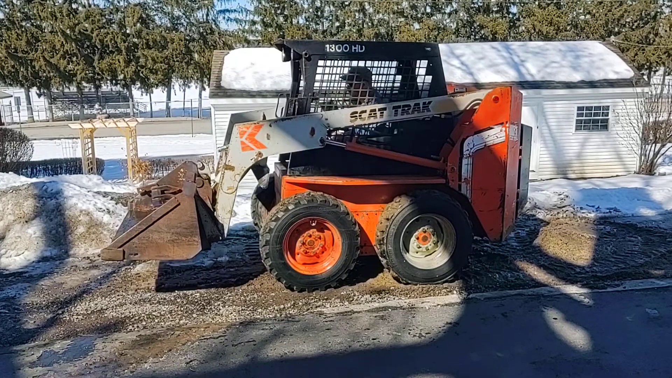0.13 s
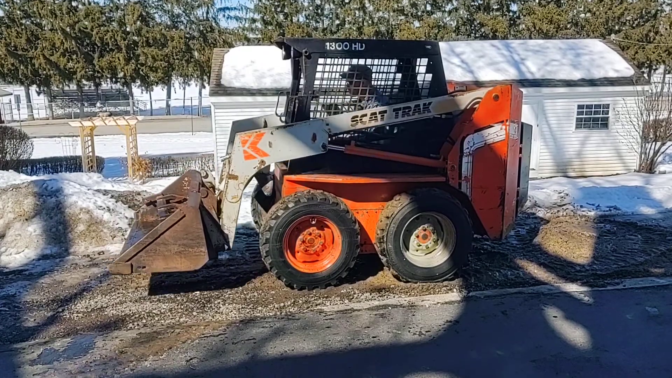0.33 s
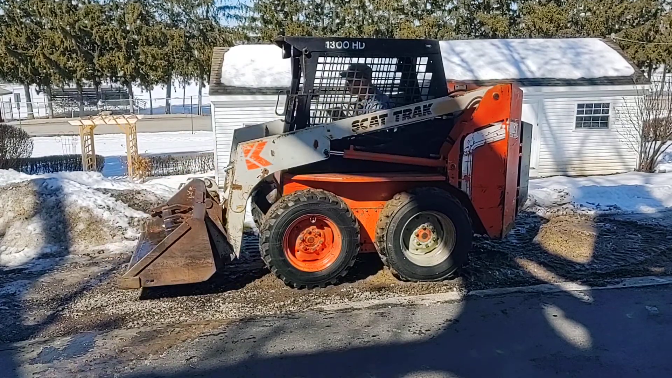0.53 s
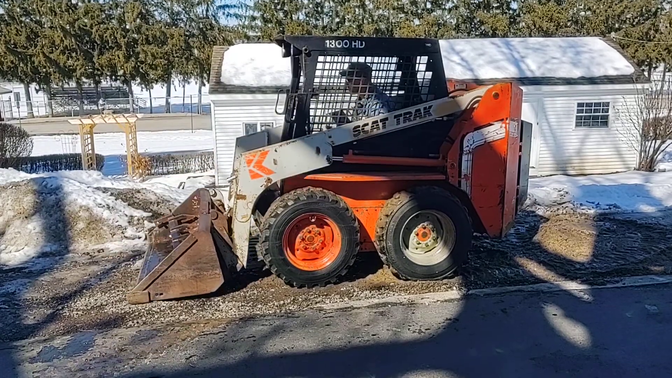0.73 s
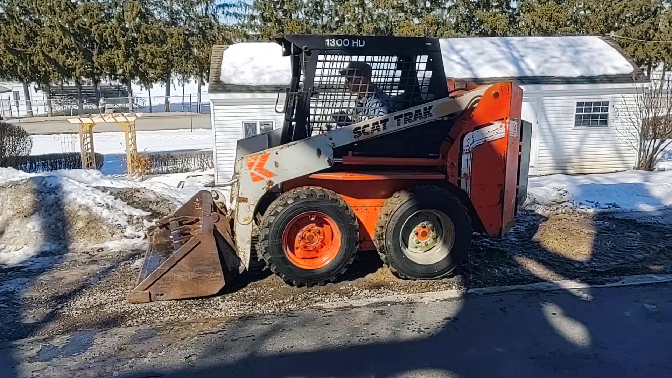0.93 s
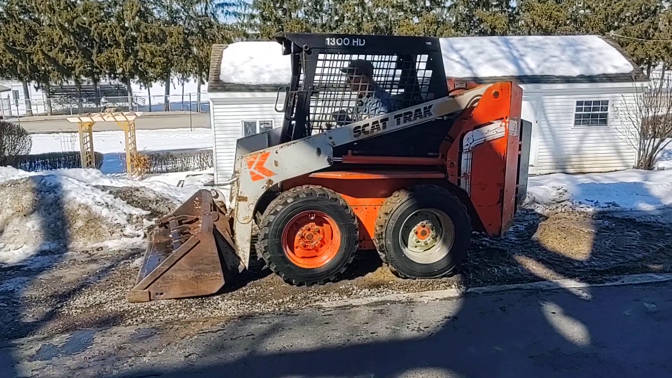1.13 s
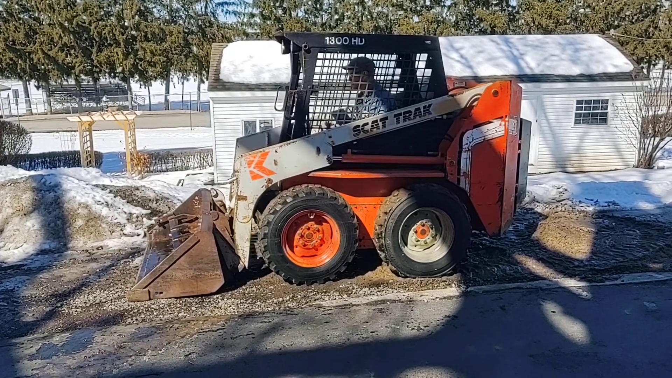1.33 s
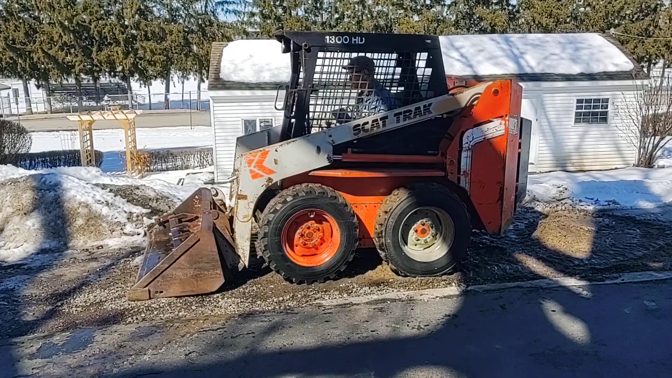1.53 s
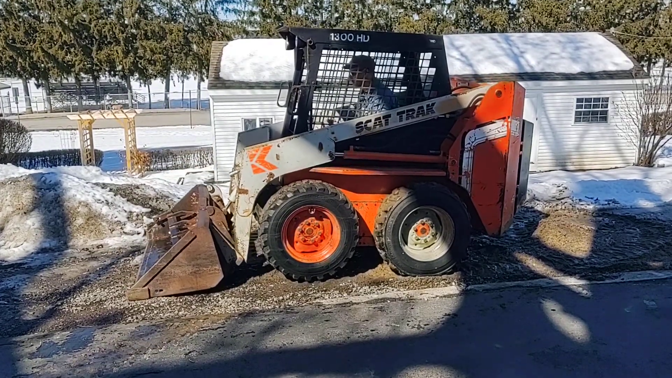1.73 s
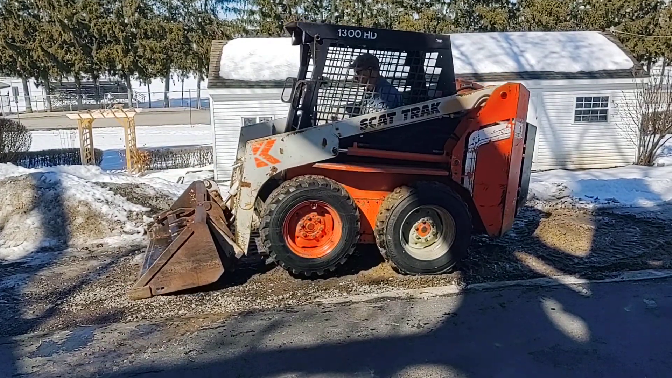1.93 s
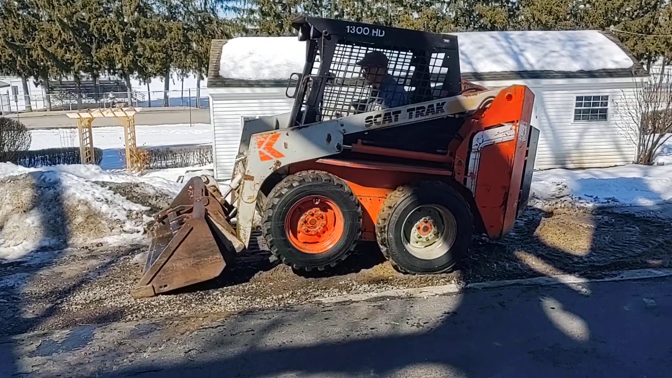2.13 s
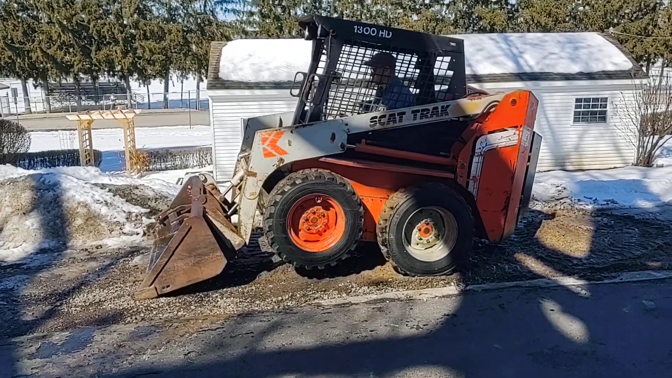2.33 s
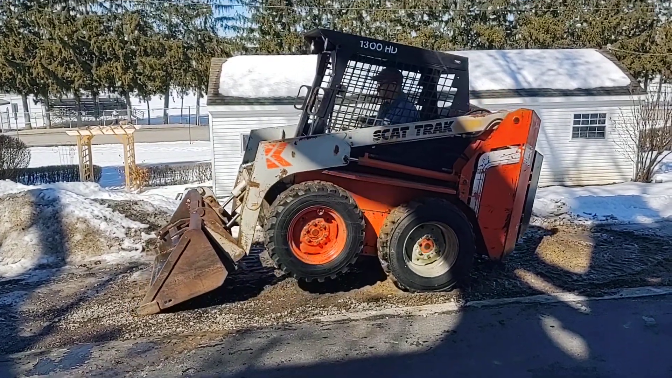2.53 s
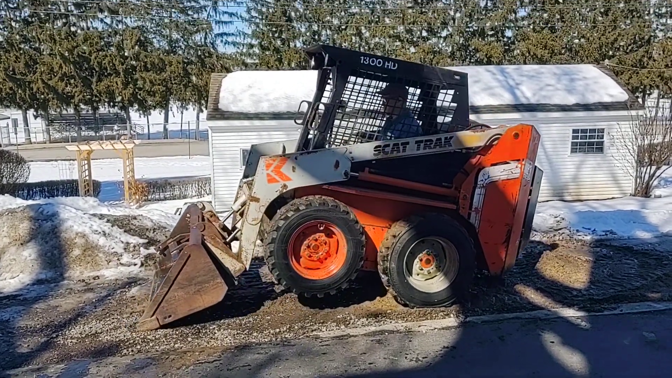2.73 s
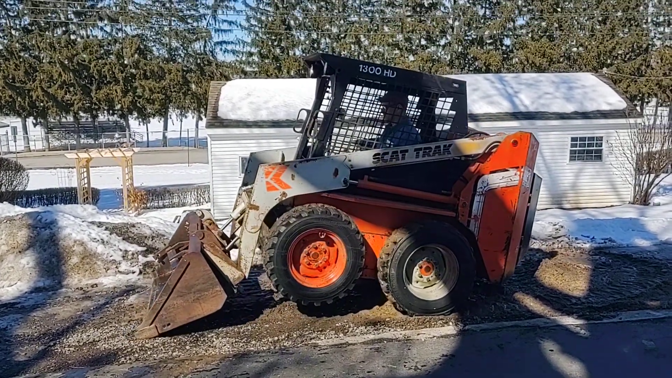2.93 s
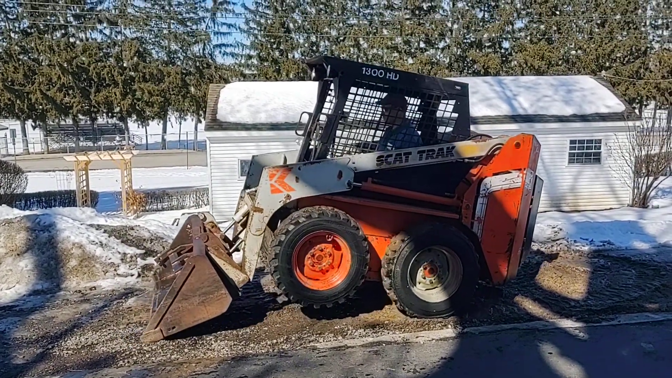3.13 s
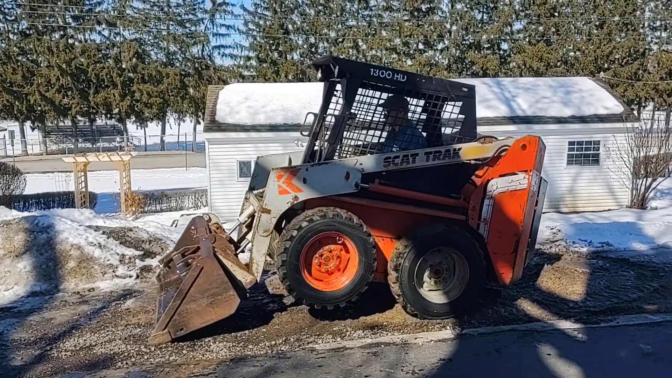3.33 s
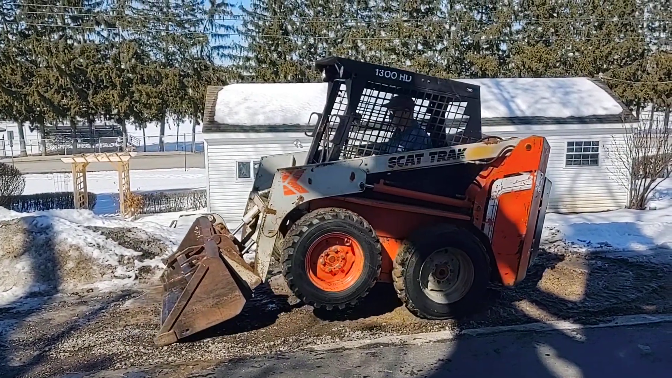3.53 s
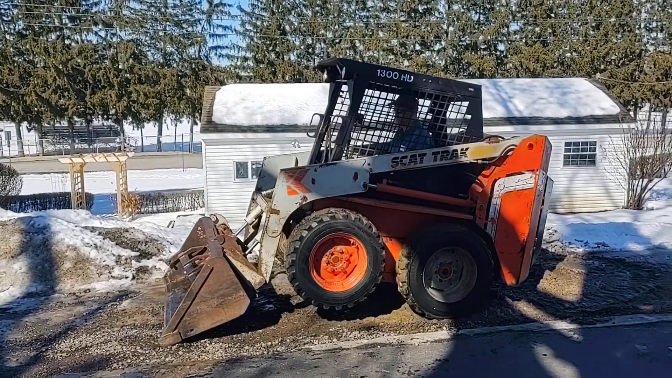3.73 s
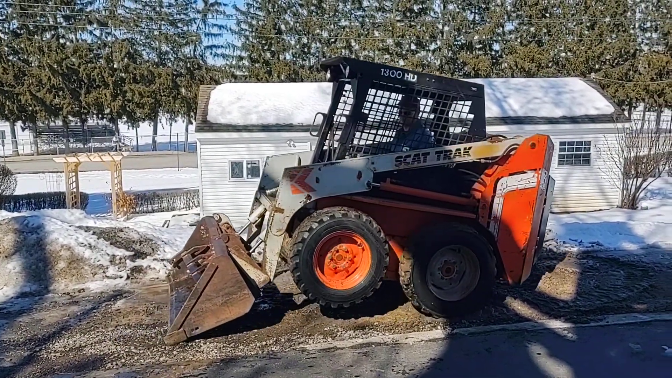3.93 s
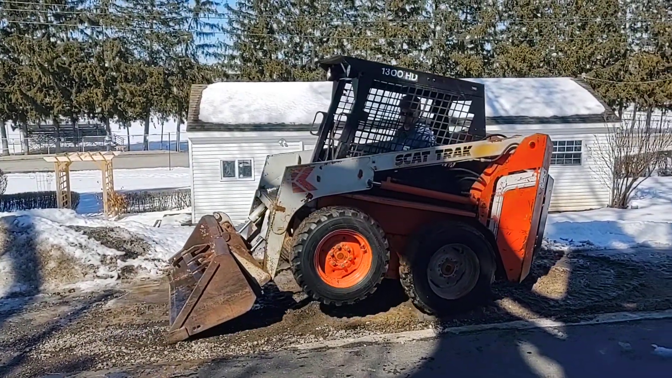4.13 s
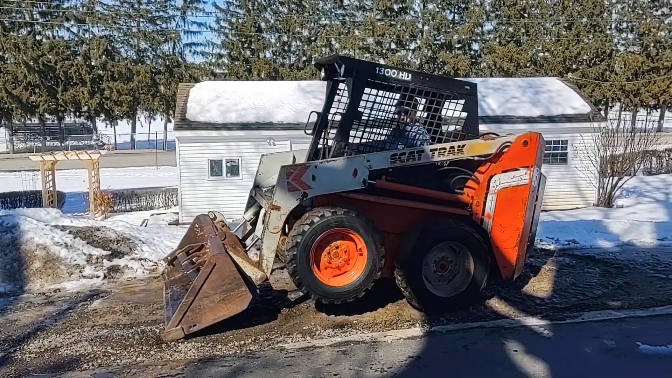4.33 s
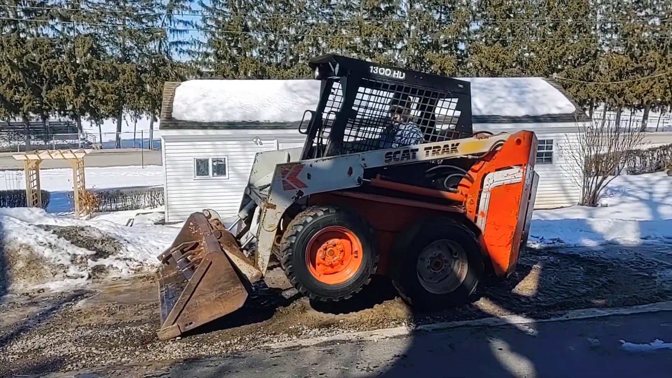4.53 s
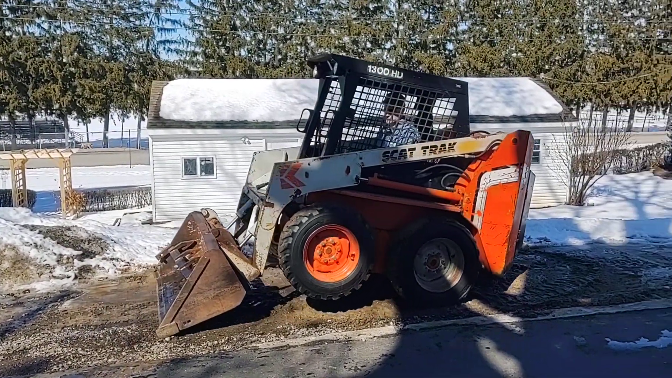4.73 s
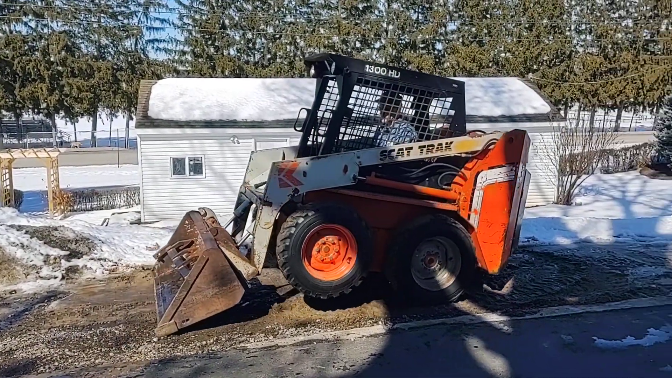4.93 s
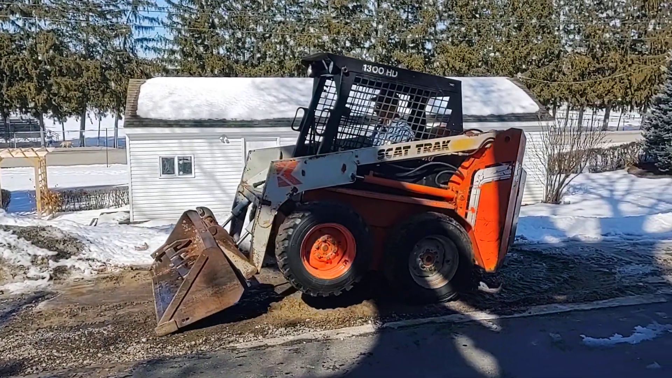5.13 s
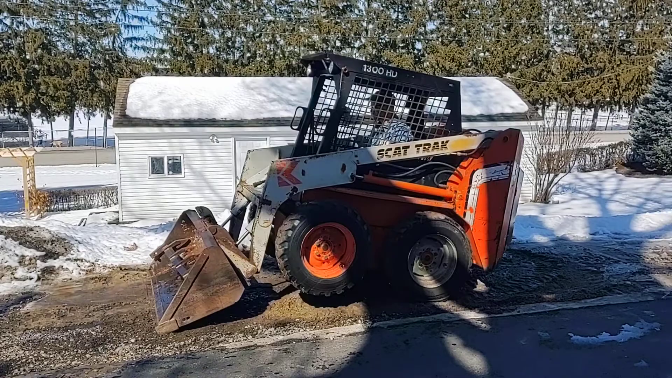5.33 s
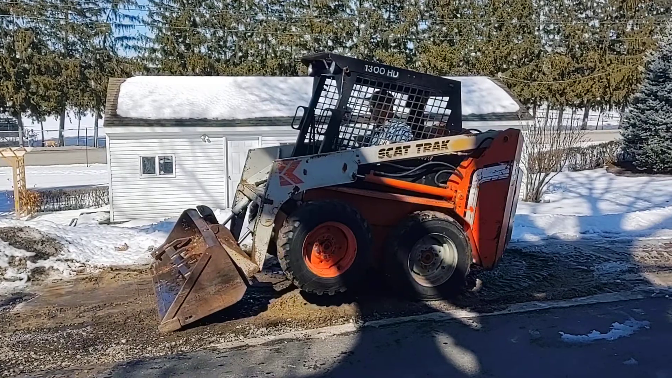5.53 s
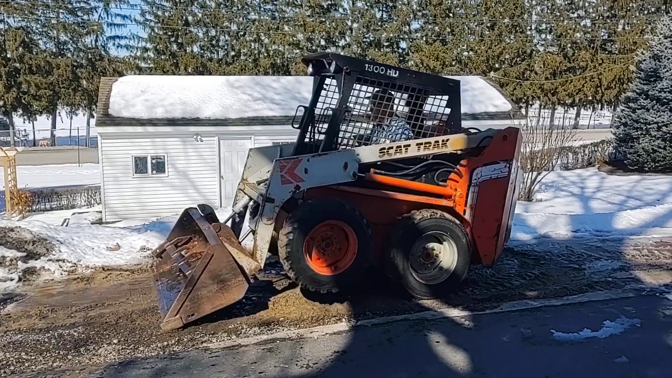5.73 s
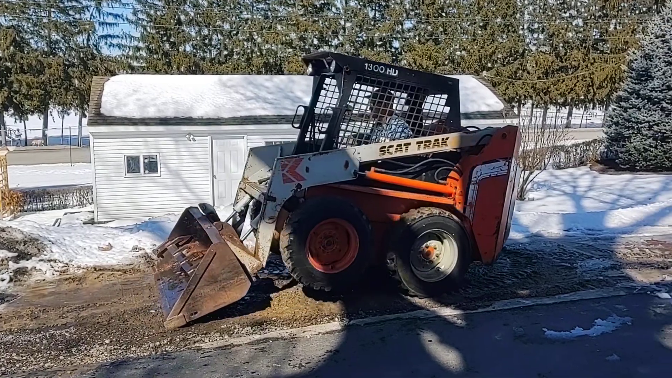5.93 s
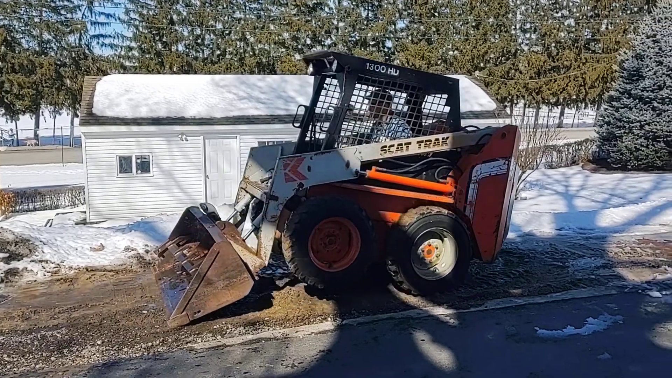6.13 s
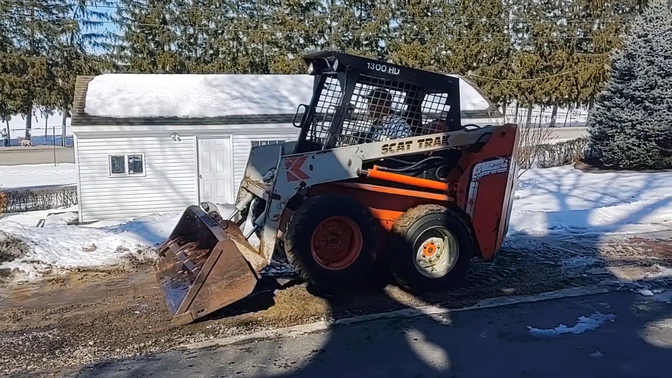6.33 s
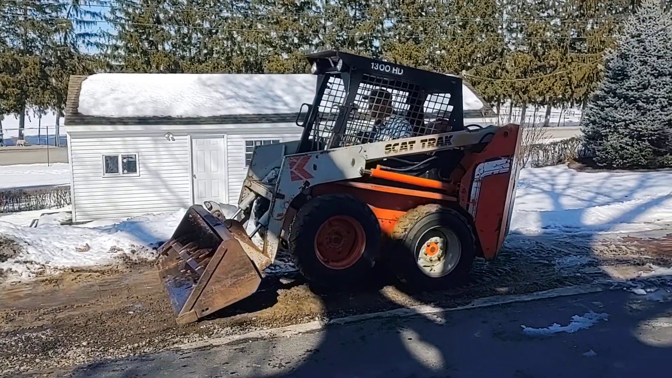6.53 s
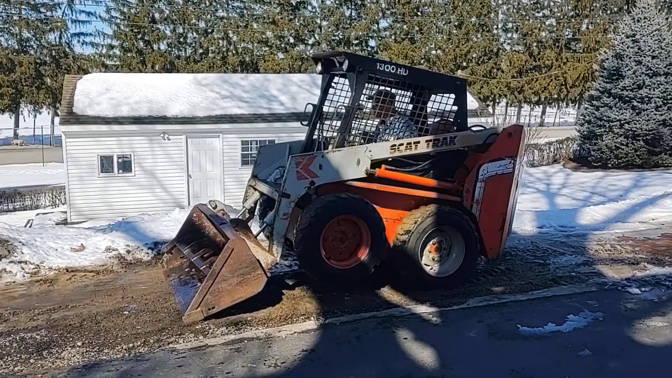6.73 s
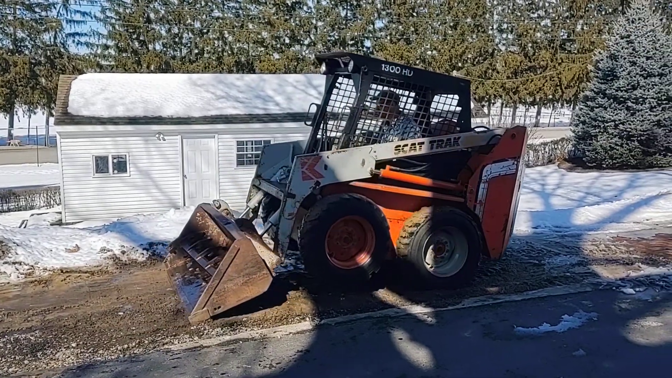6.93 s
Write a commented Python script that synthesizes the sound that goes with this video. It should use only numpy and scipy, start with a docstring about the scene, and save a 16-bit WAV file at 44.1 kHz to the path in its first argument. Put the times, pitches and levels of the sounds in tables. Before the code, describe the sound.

Outdoors, a compact loader's diesel drones at nearly constant speed with a rough, throbbing roar. Its steel bucket drops onto gravel with a low double thud and brief high squeaks. After a quieter stretch of engine, a few knocks lead into a louder pump hum and continuous uneven banging, scraping and grinding of bucket on stones. Heard in stereo from several metres away, with little echo.

```python
"""A small loader outdoors, heard by two microphone ports directly and scattered by ground and wall.
From the start a diesel runs at nearly steady speed: harmonic synthesis of firing and pump tones over noise.
The steel bucket then drops on gravel (modal synthesis from random contacts) and a dry pivot squeaks (stick-slip).
Later the drive pump hums harder as the loader rolls, and the bucket drags, knocking and grinding on stones."""
import sys
import numpy as np
from scipy import signal
from scipy.fft import rfft, irfft
from scipy.io import wavfile
from scipy.ndimage import uniform_filter1d

SR = 44100
rng = np.random.default_rng(int(sys.argv[2]) if len(sys.argv) > 2 else 0)


def master_out(mix):
    """Clip the mix to full scale and print it as 16-bit PCM to the path in sys.argv[1]."""
    frames = np.transpose(np.atleast_2d(mix))
    ceiling = np.clip(frames, -1, 1)
    pcm = np.round(ceiling * 32767).astype(np.int16)
    wavfile.write(sys.argv[1], SR, pcm)


N = 308700
TIME = np.arange(N) / SR
HZ = np.maximum(np.fft.rfftfreq(N, 1 / SR), 1)
STEP = 40   # samples between points of a slow control signal


def amp(db):
    """Decibel law: level to amplitude ratio."""
    return 10 ** (np.asarray(db) / 20)


def rms_one(x):
    """Power normalisation: scale to rms 1."""
    return x / np.sqrt(np.mean(x ** 2) + 1e-20)


def in_time(rows):
    """Linear interpolation: the columns of a time table at every sample."""
    s, *columns = np.transpose(rows)
    return [np.interp(TIME, s, c) for c in columns]


def at_hz(points):
    """Interpolation over log frequency: a spectrum table on the FFT grid."""
    hz, value = np.transpose(points)
    return np.interp(np.log(HZ), np.log(np.maximum(hz, 1)), value)


def colour(x, points):
    """Linear filtering: multiply the spectrum by a response in dB."""
    return irfft(rfft(x) * amp(at_hz(points)), N)


def fine(coarse):
    """Linear interpolation: a slow control signal at every sample."""
    return np.interp(np.arange(N) / STEP, np.arange(len(coarse)), coarse)


def drift(corner_hz):
    """Low-passed noise: two equal poles leave a slow random signal of rms 1."""
    r = np.exp(-2 * np.pi * corner_hz * STEP / SR)
    settle = 2000   # points discarded while the filter settles
    noise = rng.standard_normal(N // STEP + 2 + settle)
    slow = signal.lfilter([1], [1, -2 * r, r * r], noise)[settle:]
    return fine(rms_one(slow))


def resonate(drives, modes):
    """Modal superposition: parallel two-pole resonances, each with its own drive, in alternating sign."""
    out = 0
    for k, (drive, (hz, width_hz, db)) in enumerate(zip(drives, modes)):
        r = np.exp(-np.pi * width_hz / SR)
        top = amp(db) * (1 - r * r) / 2
        poles = [1, -2 * r * np.cos(2 * np.pi * hz / SR), r * r]
        out = out + (-1) ** k * signal.lfilter([top, 0, -top], poles, drive + 1e-18)
    return out


def grains(per_s, spread_db):
    """Shot noise: random clicks of uneven size, rms 1; rows are the direct path and a scattered path per port."""
    born = rng.random((3, N)) < per_s / SR
    size_db = spread_db * np.minimum(rng.exponential(1, born.shape), 5)
    sizes = amp(size_db) * rng.standard_normal(born.shape)
    return rms_one(sizes * born)


def burst(s, rise_s, hold_s, t60):
    """Exponential decay of one blow, as a slow control: a swell to 1 about the moment s, a hold, then decay."""
    t = np.clip(TIME[::STEP] - s + rise_s / 2, 0, None)
    swell = np.minimum(t / max(rise_s, 1e-3), 1)
    decay = amp(-60 * np.clip(t - rise_s - hold_s, 0, None) / max(t60, .02))
    return swell * decay


# drive pump, five strokes a firing: t/s, stroke rate f/Hz, hum level/dB
PUMP_DRIVE = [(0, 281, -28), (.78, 284.1, -29), (1.12, 279, -34.5), (1.35, 283, -26.5), (1.56, 282, -31.5),
              (1.76, 270.5, -44.5), (2.05, 276, -35.5), (2.57, 281, -33.5), (2.69, 293, -20),
              (3.02, 288, -17), (3.18, 280, -26.5), (3.34, 290, -16.5), (3.7, 293, -15.5), (3.85, 278, -20),
              (4.17, 293, -15), (4.36, 289, -15), (4.46, 275, -23), (4.56, 283.6, -19), (4.82, 288, -16),
              (5.25, 285, -16.5), (5.65, 292, -14.5), (5.99, 286, -17), (6.6, 285, -16), (7, 294, -14.5)]
# broadband engine noise: t/s, roar level/dB, rumble level/dB
ENGINE_NOISE = [(0, -34.5, -43.5), (1.62, -34, -44.5), (4.21, -33, -34), (7, -34.5, -34)]
# spectral density of the roar and of the rumble: f/Hz, level/dB
ROAR_SPECTRUM = [(300, -11.5), (400, -5), (600, 1), (800, -6), (1100, -8.5), (1830, -7.5), (2500, -18),
                 (3500, -25), (4600, -22.5), (5600, -12.5), (6700, -14.5), (7800, -19.5), (10000, -24.5),
                 (15600, -35.5)]
RUMBLE_SPECTRUM = [(50, -12), (90, -10), (150, 6.5), (200, 16.5), (260, 4.5), (340, 8), (430, -8),
                   (600, -33.5)]
# first three firing orders: level/dB over the common firing level
FIRING_ORDERS = [-8.5, -0.5, -8.5]
# the firing tones grow as the engine is pulled below its usual speed
USUAL_STROKES_PER_S, FIRING_DB, LABOUR_DB_PER_STROKE = 282, -33, 0.2
# the lift pump whines louder while the arms sink
WHINE_DB, ARMS_DOWN_S, WHINE_IDLE_DB = -46, .79, -53.5


def engine():
    """Harmonic synthesis: sines phase-locked to the firing rate, over noise whose roar throbs with each firing."""
    strokes_per_s, hum_db = in_time(PUMP_DRIVE)
    stroke = 2 * np.pi * np.cumsum(strokes_per_s) / SR
    firing = stroke / 5
    firing_db = FIRING_DB + LABOUR_DB_PER_STROKE * (USUAL_STROKES_PER_S - strokes_per_s)
    tones = np.zeros(N)
    for k, order_db in enumerate(FIRING_ORDERS):
        order_amp = amp(firing_db + order_db + 1.18 * drift(10.5))
        tones += order_amp * np.sin((k + 1) * firing + 1.7 * k)

    hum = amp(hum_db + 0.99 * drift(19.5))
    tones += hum * np.sin(stroke + 0.15 * drift(24.5))
    tooth = 18 * firing   # lift pump, eighteen teeth a firing
    whine = amp(np.where(TIME < ARMS_DOWN_S, WHINE_DB, WHINE_IDLE_DB))
    tones += whine * np.sin(tooth + 0.072 * drift(2.3))

    roar_db, rumble_db = in_time(ENGINE_NOISE)
    hiss = grains(30000, 2.4)
    throb = 1 + 0.082 * np.cos(firing)
    roar = amp(roar_db + 0.15 * drift(13)) * rms_one(colour(throb * hiss, ROAR_SPECTRUM))
    rumble = amp(rumble_db + 1.2 * drift(1.4)) * rms_one(colour(hiss, RUMBLE_SPECTRUM))
    return np.sqrt(2) * tones, roar + rumble   # root two: a sine's level is its rms


# landings of the bucket floor: t/s, drive level/dB
LANDINGS = [(0.79, -13.5), (0.839, -16.5), (0.881, -27.5), (0.969, -21), (1.071, -24.5)]
# low modes of the floor on the ground: f/Hz, bandwidth f/Hz, relative level/dB
FLOOR_MODES = [(147.4, 30, -1), (178, 17, 3.5), (223, 60, 0), (336, 30, -4), (380, 56, -4.5)]


def thuds():
    """Modal excitation: soft heavy landings drive the low modes of the bucket floor."""
    envelope = sum(amp(db) * burst(s, 0.013, 0.0036, 0.37) for s, db in LANDINGS)
    push = fine(envelope) * grains(2500, 1.3)
    return amp(18.5) * resonate([push] * len(FLOOR_MODES), FLOOR_MODES)


# bucket edge dragging, also the footing of the lesser knocks: t/s, drive level/dB
EDGE_DRAG = [(2.9, -35), (3.29, -26.5), (5.4, -22.5), (5.66, -33), (5.98, -26), (7, -23.5)]
# lesser knocks: base level over the drag, treble relative to the knock, decay time
PEBBLE_DB, PEBBLE_TREBLE_DB, PEBBLE_T60_S = -0.5, -13.5, 0.092


def pebbles(count):
    """Random point process: rows of lesser knocks while the edge drags; moment, strength and place are drawn."""
    when, size, place = rng.random((count, 3)).T
    start_s = EDGE_DRAG[1][0]
    s = start_s + when * (N / SR - start_s)
    level_db = np.interp(s, *np.transpose(EDGE_DRAG)) + PEBBLE_DB + 6 * size
    place_hz = 900 * 2 ** (2 * place)
    same = np.ones(count)
    return np.transpose([s, level_db, PEBBLE_TREBLE_DB * same, place_hz, PEBBLE_T60_S * same])


# stones and blows: t/s, drive level/dB, relative treble level/dB, most driven f/Hz, decay t60/s
BLOWS = [(.795, -11, -37, 1450, 0.12), (.839, -13.5, -10, 1020, 0.058), (.873, -11.5, -32, 705, .3),
         (.972, -20.5, -19, 818, .24), (1.058, -17.5, -22, 1600, 0.11), (2.36, -18.5, -22, 1140, 0.25),
         (2.433, -14.5, -24, 1170, 0.55), (2.541, -14.5, -60, 1400, 0.28), (3.073, -23, -14.5, 1600, 0.95),
         (3.184, -5.5, -34, 1440, 0.23), (3.226, -6, -35, 1720, 0.16), (3.278, -9.5, -59, 980, 0.086),
         (3.38, -11, -29, 1160, 0.19), (3.77, -8, -33, 1250, 0.23), (3.912, -14.5, -26, 1580, 0.2),
         (4.054, -4, -38, 1474, 0.16), (4.199, -10.5, -8.5, 1502, 0.17), (4.297, -22, -12, 1460, 0.28),
         (4.374, -13, -24, 1660, 0.24), (4.558, -10.5, -19, 1493, 0.064), (4.672, -11.5, -18.5, 1464, 0.12),
         (4.834, 0.5, -11, 1486, 0.18), (4.96, -15.5, -18.5, 1260, .16), (5.133, -15, -11, 977, 0.17),
         (5.23, -19, -24, 1160, 0.42), (5.365, -13, -19, 3990, 0.1), (5.421, -12.5, -25.5, 1420, 0.27),
         (5.546, -27, -4.5, 1380, .22), (5.826, -6.5, -25.5, 1000, 0.13), (5.872, -29.5, 2.5, 758, 0.24),
         (5.972, -21, -15, 2200, .15), (6.162, -21, -7, 1430, 0.13), (6.236, -8.5, -23, 1475, .14),
         (6.296, -26.5, -3.5, 1583, 0.091), (6.512, -8.5, -27, 1100, 0.23), (6.628, -17.5, -17, 930, .09),
         (6.836, -4.5, -14, 2876, .16), (6.92, 0, -21.5, 1500, .16), (6.963, -10.5, -40, 600, 0.16)]
# modes of the steel plates: f/Hz, bandwidth f/Hz, relative level/dB
PLATE_MODES = [(588, 28, -9), (732, 33, -3.5), (785, 385, -13.5), (1009, 13, -6.5), (1115, 51, -15),
               (1358, 29, -5.5), (1462, 64, -9.5), (1657.5, 20, -6), (1819, 27, -13.5), (2098, 61, -13.5),
               (2240, 66, -10), (2386, 28, -9), (2644, 360, -15.5), (3420, 51, -14), (3510, 22, -9),
               (3956, 77, -14), (4460, 79, -13), (5364, 20, -20), (6000, 210, -30), (6130, 15, -13.5),
               (6550, 45, -16.5)]
# spectral density of the unresonated grinding: f/Hz, level/dB
GRIND_SPECTRUM = [(240, -37), (400, 2), (587, -3), (1220, -3.5), (1470, 3.5), (3220, -11), (6510, -7),
                  (8850, -19.5), (13800, -24.5), (15600, -50)]
KNOCK_OCTAVES = .45   # spread of modes a knock reaches
KNOCK_RISE_S, GRIND_SHARE = 0.011, 0.11   # a knock grinds at full strength for this share of its t60


def bucket():
    """Modal excitation: dense stone contacts ring the plates; a knock drives the modes nearest its place most."""
    s, level_db, treble_db, place_hz, t60 = np.vstack([BLOWS, pebbles(count=16)]).T
    knocks = np.array([amp(db) * burst(at, KNOCK_RISE_S, GRIND_SHARE * t, t)
                       for at, db, t in zip(s, level_db, t60)])
    drag_onset = np.clip((TIME - EDGE_DRAG[0][0]) / 0.087, 0, 1)
    drag = amp(in_time(EDGE_DRAG)[0] + 0.96 * drift(63)) * drag_onset
    stones = grains(5000, 2.5)

    drives = []
    for hz, *_ in PLATE_MODES:
        near = np.exp(-.5 * (np.log2(hz / place_hz) / KNOCK_OCTAVES) ** 2)
        reach = near + amp(treble_db) * hz / 1500   # hard, bright stones also reach the high modes
        uneven = amp(2.8 * rng.standard_normal(len(s)))
        drives.append(drag * amp(3.1 * drift(7.4)) + fine((reach * uneven) @ knocks))
    ringing = resonate((stones * drive for drive in drives), PLATE_MODES)

    low, high = (signal.sosfilt(signal.butter(4, 4300, side, fs=SR, output="sos"), stones)
                 for side in ("low", "high"))
    dull = (amp(-13.0) * drag + fine(knocks.sum(0))) * low
    bright = (amp(-21.5) * drag + fine(amp(treble_db) @ knocks)) * high
    grinding = colour(amp(-11.0) * dull + amp(16.5) * bright, GRIND_SPECTRUM)
    return amp(13.5) * ringing + grinding


# pivot squeaks: t/s, length t/s, level/dB, relative second partial level/dB
PIVOT_SQUEAKS = [(.876, 0.079, -23, -26), (1.006, .07, -29, -13), (1.73, 0.092, -23.5, -4),
                 (4.647, .025, -28, -26)]
SQUEAK_HZ, THIRD_DB = 4950, -26   # third partial relative to the squeak level


def squeaks():
    """Stick-slip in a dry pin: a fluttering tone fades as the pin frees, its two overtones fading first."""
    out = np.zeros(N)
    for s, length, db, second_db in PIVOT_SQUEAKS:
        phase = 2 * np.pi * SQUEAK_HZ * TIME + .9 * drift(70)
        release = np.clip((s + length - TIME) / 0.017, 0, 1)
        gate = fine(burst(s, 0.004, 0.014, 3.3 * length)) * release
        flutter = amp(3.5 * drift(70))
        overtones = amp(second_db) * np.sin(2 * phase) + amp(THIRD_DB) * np.sin(3 * phase)
        out += amp(db) * gate * (flutter * np.sin(phase) + gate ** 2 * overtones)
    return out


# shading between the ports: f/Hz, left minus right level/dB
PORT_BALANCE = [(60, -4), (99, 2), (160, -3.5), (270, 0.5), (450, -3.5), (740, -0.5), (1220, -4.5),
                (2010, 7.5), (3330, -5.5), (5500, 9), (9080, -7.5), (15000, -13.5)]
# phase between the ports: f/Hz, left lead phase/rad
PORT_LEAD = [(30, 0), (290, -.15), (860, -.2), (1380, .6), (1980, -.1), (2670, .5), (3360, -1.4),
             (3880, .2), (6890, -6), (8790, -14.7), (11700, -14.3), (13500, -16.8), (15300, -26.4)]
# sound scattered by ground and wall: f/Hz, scattered over direct level/dB
SCATTER = [(60, -20), (300, -24), (600, -10), (1200, -5), (2500, -3), (6000, 0), (15000, 4)]


def scene():
    """Superposition: each port adds direct sound, with its own phase and shading, to noise scattered to it alone."""
    tones, noise = engine()
    direct, *scattered = rfft(noise + thuds() + bucket() + squeaks() * 0)
    echo, side = amp(at_hz(SCATTER)), np.array([[.5], [-.5]])   # half of each difference to each port
    turn = np.exp(1j * side * at_hz(PORT_LEAD))
    mixed = (turn * direct + echo * np.array(scattered)) / np.sqrt(1 + echo ** 2)   # power kept
    heard = turn * rfft(tones + squeaks()) + mixed
    return irfft(heard * amp(side * at_hz(PORT_BALANCE)), N)


LIMIT_DB, EXCESS_FALL_DB_S = -1, 80   # threshold; fall of the held excess
CUTOFF_HZ = 15750


def record(dry):
    """Peak limiting: loud knocks duck everything, with slow release; peaks clip, deep bass and top are cut."""
    dry = signal.sosfilt(signal.butter(4, 44, "high", fs=SR, output="sos"), dry)
    over_db = np.clip(20 * np.log10(np.abs(dry).max(0) + 1e-9) - LIMIT_DB, 0, None)
    fall_db = EXCESS_FALL_DB_S * TIME
    held_db = np.maximum.accumulate(over_db + fall_db) - fall_db
    gain = amp(-.6 * uniform_filter1d(held_db, size=200))   # takes off 0.6 dB per dB of excess
    clipped = np.clip(gain * dry, -1, 1)
    return signal.sosfilt(signal.cheby2(16, 50, CUTOFF_HZ, fs=SR, output="sos"), clipped)


dry = scene()
out = record(dry)
master_out(out)
```